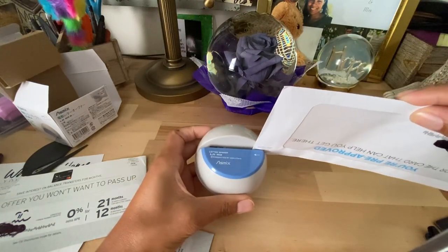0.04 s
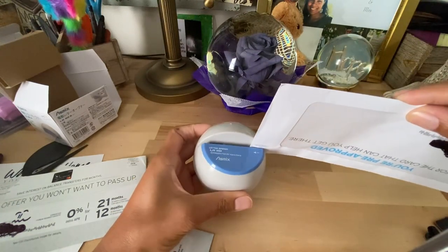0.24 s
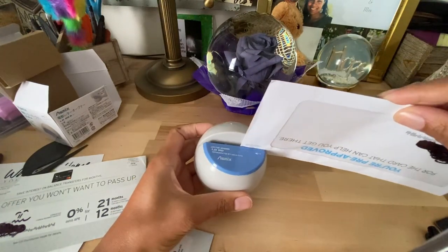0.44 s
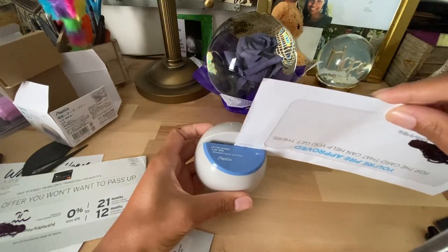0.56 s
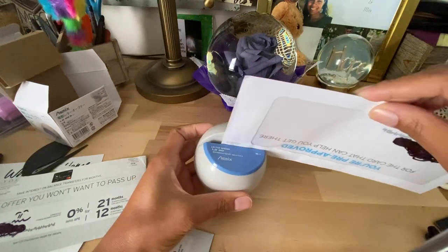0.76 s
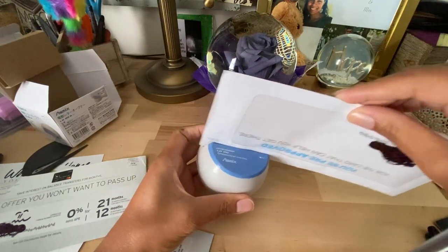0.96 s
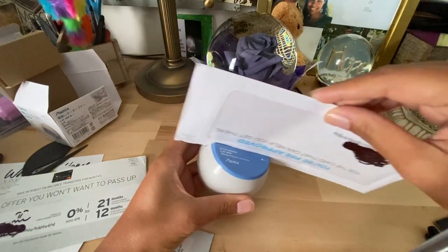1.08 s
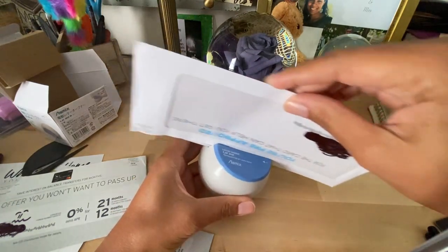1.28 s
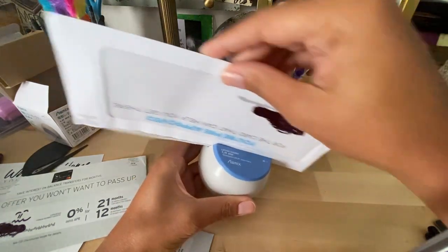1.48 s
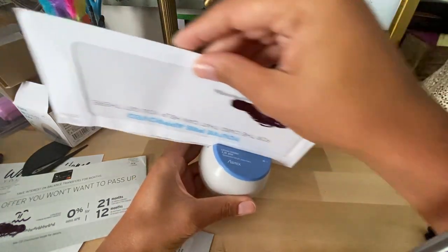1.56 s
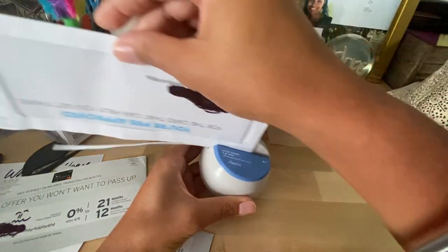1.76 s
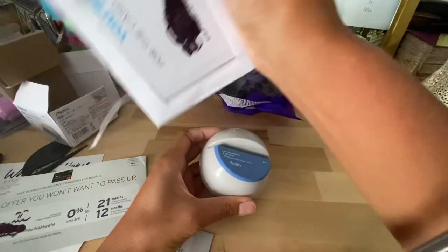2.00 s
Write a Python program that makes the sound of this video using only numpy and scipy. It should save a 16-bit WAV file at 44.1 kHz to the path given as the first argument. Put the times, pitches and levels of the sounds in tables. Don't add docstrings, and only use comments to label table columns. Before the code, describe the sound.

A small battery letter opener whirs and rattles through an envelope edge, then its motor coasts down

```python
import sys
import numpy as np
from scipy import signal
from scipy.fft import rfft, irfft, next_fast_len
from scipy.io import wavfile
from scipy.ndimage import uniform_filter1d

SR = 44100
rng = np.random.default_rng(int(sys.argv[2]) if len(sys.argv) > 2 else 0)


def unload_wav(signal):
    wavfile.write(
        sys.argv[1],
        SR,
        np.round(np.clip(np.atleast_2d(signal).T, -1, 1) * 32767).astype(np.int16),
    )


def invert_db(x):
    u = np.asarray(x, float) / 20
    return 10 ** u


N = 89567
T = np.arange(N) / SR
PAD = next_fast_len(N + SR // 10)
FREQ = np.arange(PAD // 2 + 1) * SR / PAD

# pitch_hz, level_db
ROOM_SPECTRUM = [(20, -28), (45, 1), (75, -1), (150, -12), (380, -16), (600, -24.5), (3000, -35.5),
                 (12000, -41)]
# start_s, end_s, level_db
PAPER_SLIDES = [
    (.1, .22, -90),
    (0.212, 0.383, -70),
    (0.267, 0.378, -76),
    (0.4, 0.467, -71.5),
    (0.473, 0.54, -76.5),
    (0.541, 0.734, -69),
]
# pitch_hz, width_hz, level_db
SHEET_RINGS = [(1550, 120, -1), (2660, 770, 8.5), (5460, 510, 3.5), (6440, 3400, 7.5), (14500, 1200, -7)]
# time_s, peak_db, pitch_hz, ring_s
PAPER_TICKS = [(0.3878, -52, 4800, .0012), (0.3885, -56, 6200, .003), (0.3892, -55, 1500, .003),
               (0.3885, -64, 9500, .001), (0.6328, -58, 5000, .001), (0.6358, -54, 2850, .002),
               (0.6365, -60, 1700, .003), (0.6362, -57, 6800, .001)]
# start_s, end_s, pitch_hz, width_hz, level_db
PAPER_CREAKS = [
    (.03, 0.43, 1587, 71, -82.5),
    (0.646, 0.683, 700, 90, -70),
]
# pitch_hz, level_db
CUT_SPECTRUM = [(30, -24), (55, -9), (120, -10), (250, -4.5), (400, -0.5), (520, -10), (700, -25)]
# time_s, speed_0_to_1
MOTOR_SPEED = [
    (.712, .75),
    (.745, .88),
    (.79, .93),
    (.85, 1.0),
    (1.855, 1.0),
    (1.91, .82),
    (1.96, .59),
    (2.0, .425),
    (2.03, .33),
]
# time_s, effort_db
GEAR_EFFORT = [(.719, -58), (.727, -43.5), (.742, -26.5), (.76, -23.5), (.78, -22), (.95, -23.5),
               (1.05, -25.5), (1.3, -24.5), (1.5, -23.5), (1.75, -25), (1.81, -26.5), (1.87, -24.5),
               (1.91, -28.5), (1.99, -32), (2.03, -38)]
# time_s, level_db
SHEET_COVER = [(.75, -1.5), (1.1, 1), (1.2, -0.5), (1.45, -2), (1.8, -4.5), (1.86, -2.5), (1.95, -3),
               (2.03, -5.5)]
# pitch_hz, width_hz, level_db, left_over_right_db
SHELL_RINGS = [(617, 46, -7, -1), (657.4, 103, -4, 0.7), (756, 71, -1.5, 1.7), (1215, 69, -10, 0.5),
               (1590, 79, -12, -8.5), (2085, 180, -5, 6), (2362, 265, -6, 17), (2726, 26, -7, -5.5),
               (3774, 175, -7, 1), (4390, 270, -3, -1), (4624, 75, -1, 1), (5060, 130, -5, 2),
               (6230, 330, -13, 15), (7000, 1530, -4.5, 1), (9460, 1200, -6.5, -8.5)]
# time_s, peak_db, high_ring_share
WHEEL_KNOCKS = [(0.7333, -26, 0), (0.7415, -15.5, 0), (0.772, -1.5, 0.35), (0.7885, -10.5, 0.6),
                (0.8, -11.5, 0.86), (0.83, -15, 0.4), (0.8945, -6, 0.37), (0.915, -10, 0.85),
                (0.927, -1, 0.44), (1.08, -7, 1), (1.203, -26, 0.5), (1.2339, -4, 0.36), (1.359, -9, 0),
                (1.389, -10, 0.75), (1.515, -37, 0.6), (1.5418, -8, 0.59), (1.6954, -4.5, 0.27),
                (1.721, -10, 0.3), (1.814, -23, 0.9), (1.8482, -13, 0.58), (1.936, -24, 1),
                (1.9805, -21.5, 0.1)]
# time_s, level_db
BASE_BUMPS = [(0.757, -4), (0.847, -2.5), (1.093, -10.5), (1.224, -39), (1.877, -6), (1.937, -16),
              (2.011, -13.5)]
# multiple, level_db
MESH_HARMONICS = [(1, -4), (2, -7.5), (3, -5)]
# start_s, end_s, mesh_multiple, level_db
COAST_TONES = [
    (1.883, 1.89, 1, -9),
    (1.897, 1.906, 1, 5),
    (1.955, 1.972, 2, -5),
    (1.972, 1.983, 2, 7.5),
    (1.992, 2.005, 2, 3),
]
# pitch_hz, level_db
HISS_SPECTRUM = [(350, -85), (600, -6), (1500, -10.5), (2300, 1), (3200, -3), (4600, -7), (7700, -10.5),
                 (16000, -19.5)]
# pitch_hz, level_db
MIC_COLOUR = [(100, 0.), (10900, 0.), (11500, -5), (12000, -19), (12900, -4), (13500, 8), (14000, 2),
              (15200, -1.5), (15600, -24), (16500, -50)]

TURN_S, TEETH, SHAFT_TURNS = .15375, 26, 13
MESH_HZ = 2301
KNOCK_DB = 14.5
GRAIN_DB = 1.6
APART = .25
PORT_LAG_S = 0.0001752


def unit(x):
    return x / np.sqrt(np.mean(x ** 2))


def ring(x, hz, width):
    return signal.lfilter(*signal.iirpeak(hz, hz / width, SR), x)


def colour(x, table):
    hz, db = np.array(table).T
    gain = invert_db(np.interp(np.log(FREQ + 1), np.log(hz), db))
    return irfft(rfft(x, PAD) * gain, PAD)[..., :N]


def walk(rate):
    k = max(int(SR / rate), 1)
    return unit(uniform_filter1d(uniform_filter1d(rng.standard_normal(N), k), k))


def late(x, s):
    return irfft(rfft(x, PAD) * np.exp(-2j * np.pi * FREQ * s), PAD)[..., :N]


def ports(x, other, apart):
    direct = late(x, PORT_LAG_S) * np.cos(walk(9.4))
    echo = invert_db(1) * late(x, 0.000478) * np.cos(1.53 * walk(3.0))
    paths = direct + echo
    paths = paths * x.std() / paths.std()
    return np.array([x, np.sqrt(1 - apart) * paths + np.sqrt(apart) * other])


def pulse(s, rise, fall):
    u = np.maximum(T - s, 0)
    return 1.155 * (1 - np.exp(-u / rise)) * np.exp(-u / fall)


def box(a, b):
    on = 1 / (1 + np.exp(np.clip((a - T) / 0.0034, -50, 50)))
    off = 1 / (1 + np.exp(np.clip((T - b) / 0.0091, -50, 50)))
    return on * off


def rattle(gate, sparse_db):
    sizes = invert_db(sparse_db * rng.exponential(1, N))
    return unit(gate * rng.choice([-1., 1.], N) * sizes)


def port_rattle():
    return ports(rattle(1, GRAIN_DB), rattle(1, GRAIN_DB), APART)


def room():
    mid, side = rng.standard_normal((2, N))
    air = unit(colour(mid + 0.7 * side * np.array([[1], [-1]]), ROOM_SPECTRUM))
    hum = invert_db(-67 + 3 * walk(25)) * np.sin(2 * np.pi * 123.5 * T)
    return air * invert_db(-65.5 + 1.2 * walk(9)) + hum


def desk_thump():
    swing = 2 * np.pi * 49.2 * T
    swell = np.exp(-((T - 1.009) / 0.045) ** 2)
    return invert_db(-40) * swell * (np.sin(swing) + 0.39 * np.sin(2 * swing))


def paper_slide():
    rub = sum(invert_db(db) * box(a, b) for a, b, db in PAPER_SLIDES)
    rub = rub * invert_db(1.2 * walk(40) + 1.2 * walk(150))
    rub = rub + sum(invert_db(db - 7) * pulse(s, 0.00052, 0.0029) for s, db, _, _ in PAPER_TICKS)
    noise = unit(sum(invert_db(db) * unit(ring(rng.standard_normal((2, N)), hz, width))
                     for hz, width, db in SHEET_RINGS))
    snaps = sum(invert_db(db) * pulse(s, 0.00053, fall) * np.sin(2 * np.pi * hz * (T - s))
                for s, db, hz, fall in PAPER_TICKS)
    grain = rng.standard_normal(N)
    creaks = sum(invert_db(db) * box(a, b) * unit(ring(ring(grain, hz, width), hz, width))
                 for a, b, hz, width, db in PAPER_CREAKS)
    return rub * noise + snaps + creaks


def blade_cut():
    mid, side = rng.standard_normal((2, N))
    sides = mid * np.array([[1.3], [.9]]) + 0.51 * side * np.array([[1], [-1]])
    bite_db = 6.5 * np.exp(-((T - 1.009) / 0.12) ** 2) + 2.2 * walk(30)
    return unit(colour(sides, CUT_SPECTRUM)) * box(0.84, 1.86) * invert_db(-49.5 + bite_db)


def paper_hiss(effort, cover):
    hiss = unit(colour(port_rattle(), HISS_SPECTRUM))
    return invert_db(-0.5 + .5 * cover + 0.95 * walk(51)) * hiss * effort


def bearing_squeak(turn, effort, speed):
    wear = rng.standard_normal(TEETH)[(turn * TEETH).astype(int) % TEETH]
    tooth = (turn * TEETH) % 1
    chirp = 0.56 + np.exp(-tooth / 1.3) * invert_db(4.5 * wear)
    swell = invert_db(0.5 * np.cos(2 * np.pi * (turn + 0.11)))
    hz, width = 14600, 1700
    squeak = ring(ring(rattle(chirp * swell, GRAIN_DB), hz, width), hz, 1.5 * width)
    squeak = unit(squeak) * effort * speed
    return invert_db(-10.5) * np.array([squeak, late(squeak, .000085)])


def coasting_whine(phase, effort):
    free = sum(invert_db(db) * box(a, b) * np.cos(m * phase + 0.74 * walk(250)) for a, b, m, db in COAST_TONES)
    free = ring(ring(free * effort, 2150, 700.), 2150, 900.)
    return np.array([2.4 * free, late(free, PORT_LAG_S)])


def mesh_tone(phase, level_db):
    tone = 0
    for m, db in MESH_HARMONICS:
        rough = walk(149) * np.cos(m * phase) + walk(149) * np.sin(m * phase)
        tone = tone + invert_db(db + m * level_db) * rough
    return tone


def gear_whine(phase, turn, speed, effort, cover):
    coast_db = 3 * (1.5 - speed) * (T > 1.5)
    shaft = invert_db(1.5 * np.cos(2 * np.pi * SHAFT_TURNS * turn))
    whine = [mesh_tone(phase, cover + coast_db) * shaft * effort for _ in range(2)]
    whine = [ring(w, MESH_HZ, 630) + ring(w, 2 * MESH_HZ, 1260) for w in whine]
    return invert_db(.5 * cover) * ports(*whine, APART)


def knock_hit(s):
    rise, fall, gap = 0.0014, 0.003, 0.0046
    return pulse(s, rise, fall) + 0.7 * pulse(s + gap, rise, fall)


def jammed_gears(low, high, phase):
    octave = invert_db(1.5) * high * np.cos(2 * phase + 1.1 * walk(150))
    jam = invert_db(1.5 - KNOCK_DB) * (low * np.cos(phase) + octave)
    return np.array([0.91 * jam, 0.29 * late(jam, PORT_LAG_S)])


def gear_shell(turn, effort, cover, low, high):
    wear = rng.standard_normal(TEETH)[(turn * TEETH).astype(int) % TEETH]
    tooth = (turn * TEETH) % 1
    gate = (0.5 + np.exp(-tooth / 0.6) * invert_db(1.7 * wear)) * effort
    grit = port_rattle()
    deep = rattle(1, 1.5)
    low_apart = 0.017
    deep_right = np.sqrt(1 - low_apart) * late(deep, 0.00033) + np.sqrt(low_apart) * grit[1]
    deep = np.array([deep, deep_right])
    bumps = sum(invert_db(db) * pulse(s, 0.0024, 0.0035) for s, db in BASE_BUMPS)
    shell = 0
    for k, (hz, width, db, pan_db) in enumerate(SHELL_RINGS):
        if hz > 3000:
            knock = .1 * high
        elif hz > 1800:
            knock = .1 * low
        else:
            knock = bumps if hz < 1000 else 0
        shade_db = 0
        if 2500 < hz < 8000:
            shade_db = cover
        elif hz < 1000:
            shade_db = -0.45 * cover
        drive = gate * invert_db(shade_db) * invert_db(1.3 * walk(7.5)) + knock
        clicks = grit if hz > 1000 else deep
        sides = invert_db(db + np.array([[pan_db], [-pan_db]]) / 2) / np.sqrt(width / 100)
        shell = shell + (-1) ** k * sides * ring(clicks * drive, hz, width)
    return invert_db(15.5) * shell


def opener():
    speed = np.interp(T, *np.array(MOTOR_SPEED).T)
    effort = invert_db(np.interp(T, *np.array(GEAR_EFFORT).T, left=-120))
    cover = np.interp(T, *np.array(SHEET_COVER).T)
    turn = np.cumsum(speed) / SR / TURN_S
    wobble = 1 + .014 * walk(12)
    phase = 2 * np.pi * np.cumsum(speed * wobble) * MESH_HZ / SR
    low = sum(invert_db(db + KNOCK_DB) * knock_hit(s) for s, db, _ in WHEEL_KNOCKS)
    high = sum(share * invert_db(db + KNOCK_DB) * knock_hit(s) for s, db, share in WHEEL_KNOCKS)
    fine = paper_hiss(effort, cover) + bearing_squeak(turn, effort, speed)
    whine = coasting_whine(phase, effort) + gear_whine(phase, turn, speed, effort, cover)
    return fine + whine + jammed_gears(low, high, phase) + gear_shell(turn, effort, cover, low, high)


def desk_echo(near):
    u = np.arange(SR // 3) / SR
    tail = rng.standard_normal((2, len(u))) * np.exp(-np.log(1000) * u / .2) * (u > .003)
    tail = tail / np.sqrt((tail ** 2).sum(axis=1, keepdims=True))
    return invert_db(-16) * signal.fftconvolve(near, tail, axes=1)[:, :N]


def scene():
    near = opener()
    return room() + desk_thump() + paper_slide() + blade_cut() + desk_echo(near) + near


def top_cut(x):
    return signal.sosfilt(signal.butter(12, 16320, fs=SR, output="sos"), x)


def record(dry):
    mix = colour(dry, MIC_COLOUR)
    return top_cut(mix)


dry = scene()
out = record(dry)
unload_wav(out)
```